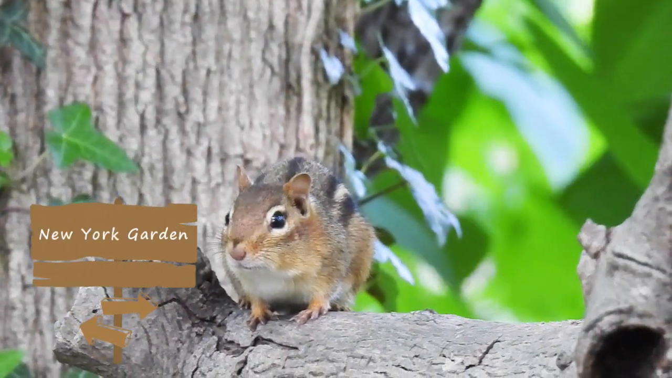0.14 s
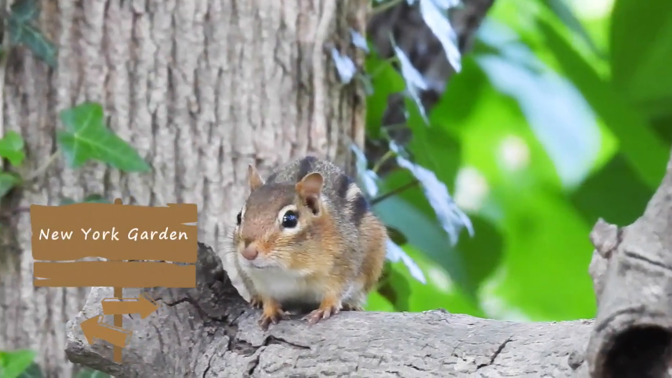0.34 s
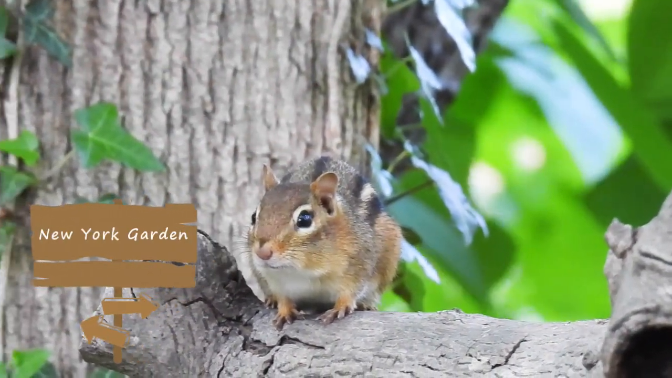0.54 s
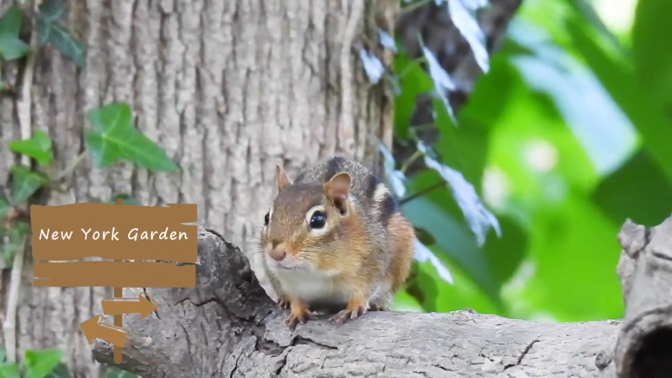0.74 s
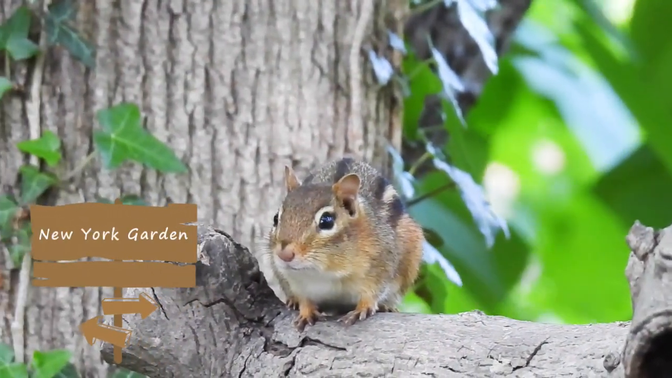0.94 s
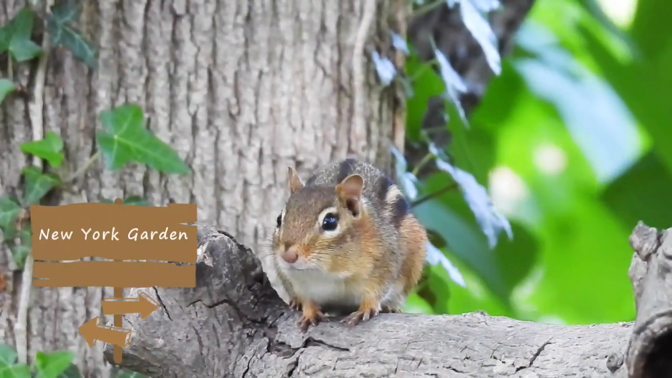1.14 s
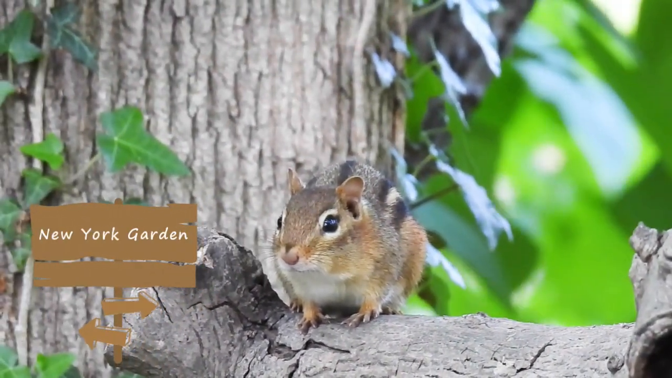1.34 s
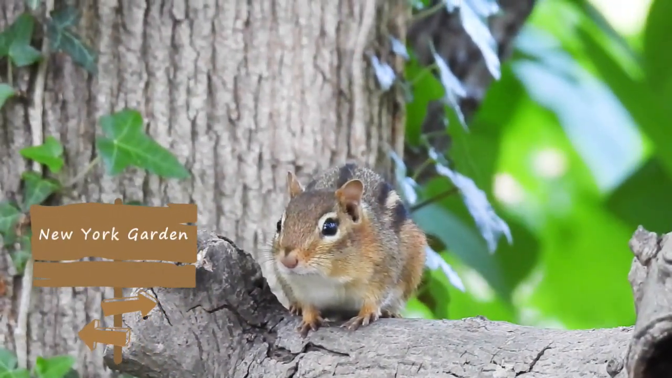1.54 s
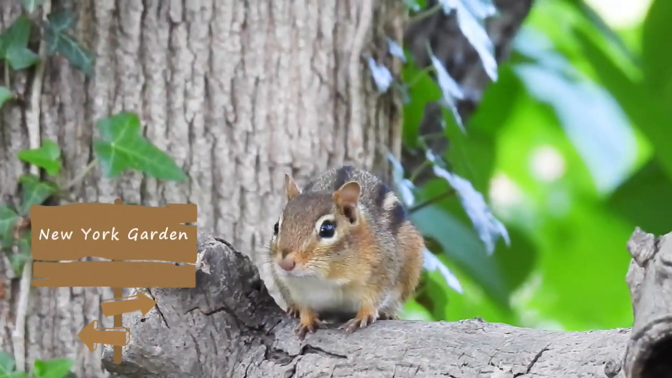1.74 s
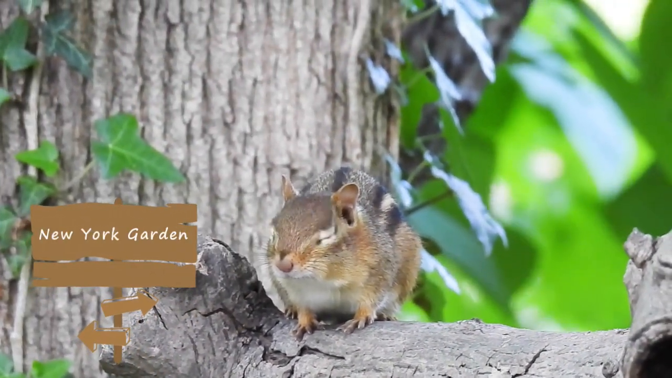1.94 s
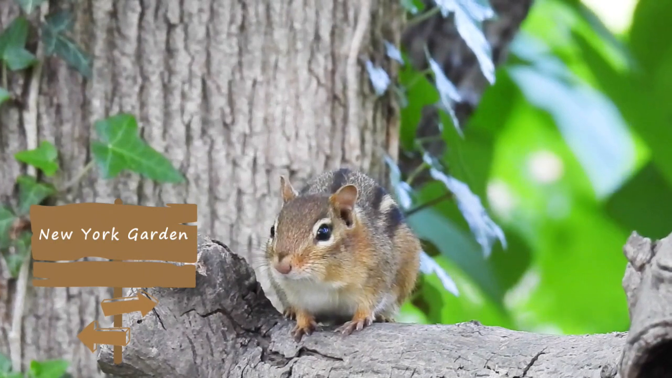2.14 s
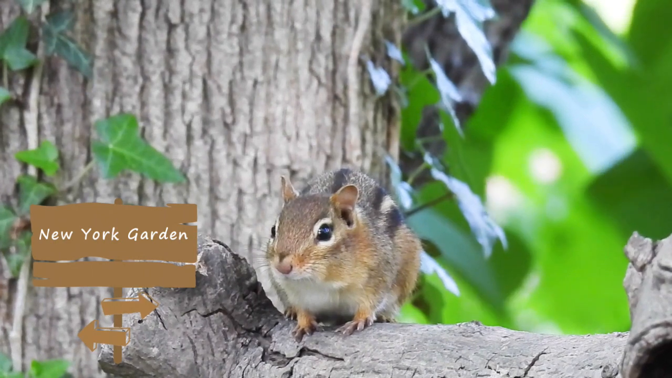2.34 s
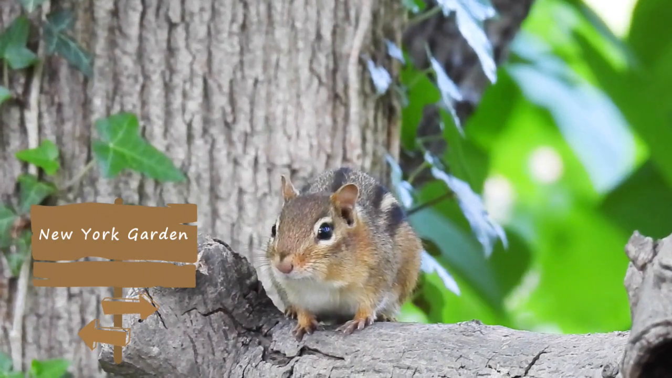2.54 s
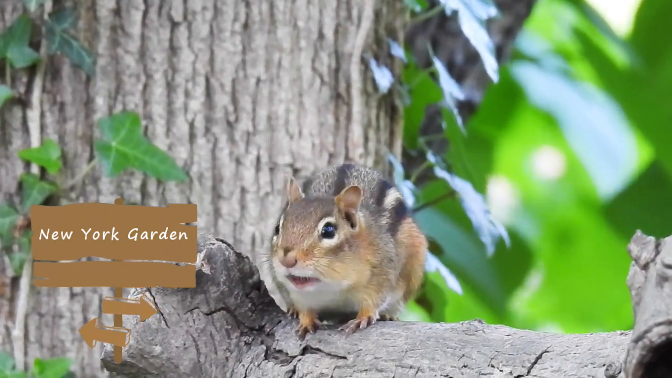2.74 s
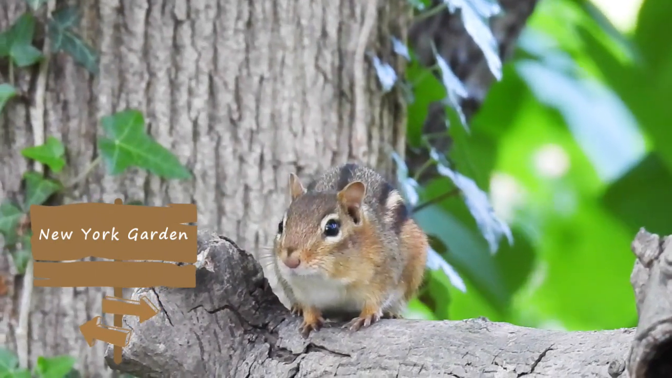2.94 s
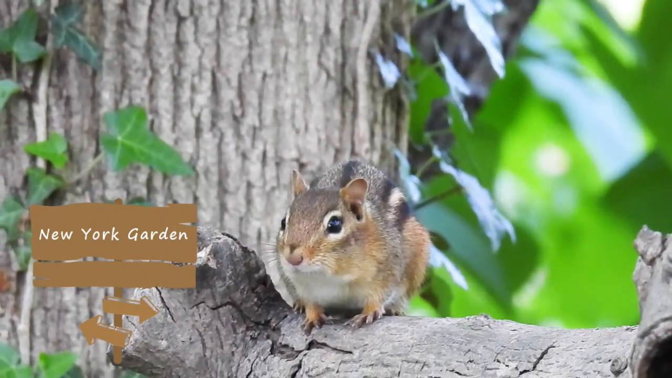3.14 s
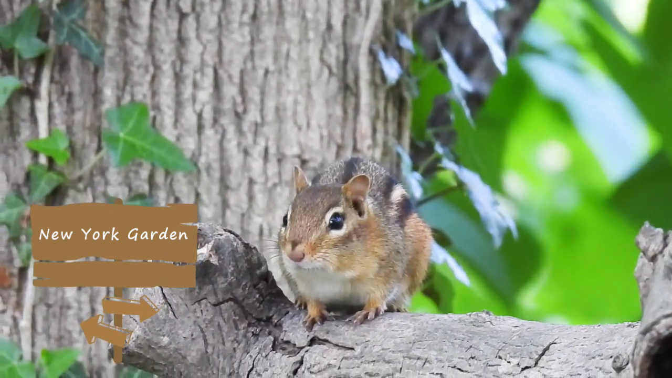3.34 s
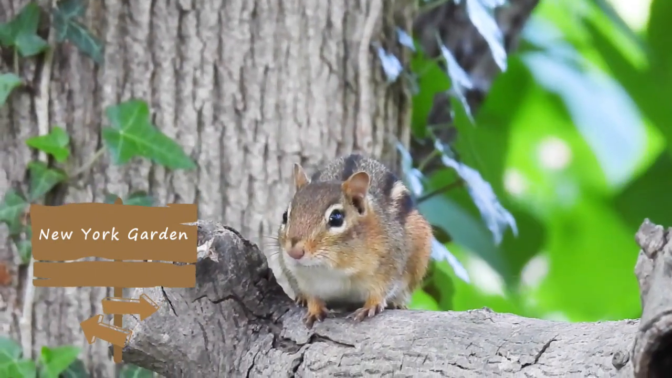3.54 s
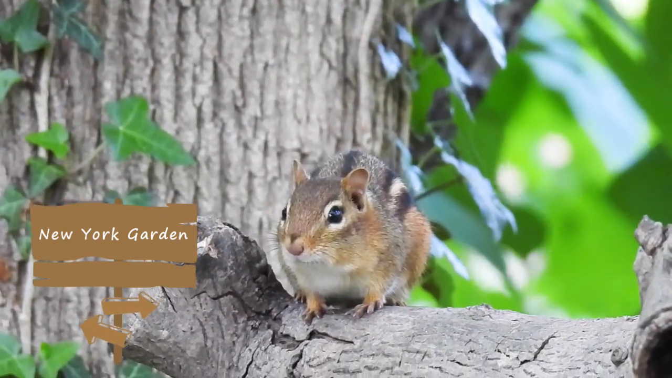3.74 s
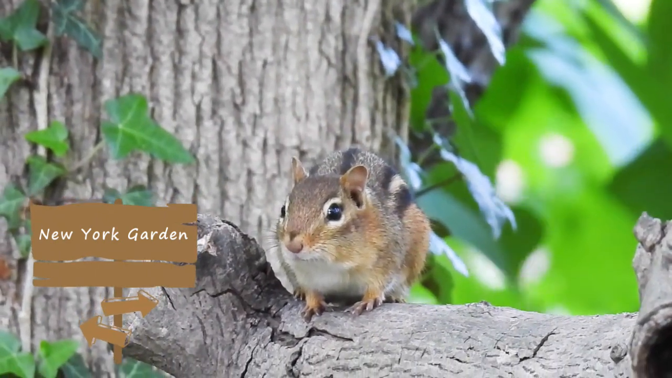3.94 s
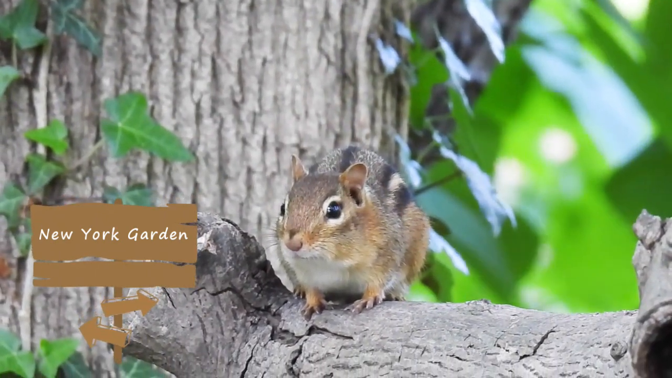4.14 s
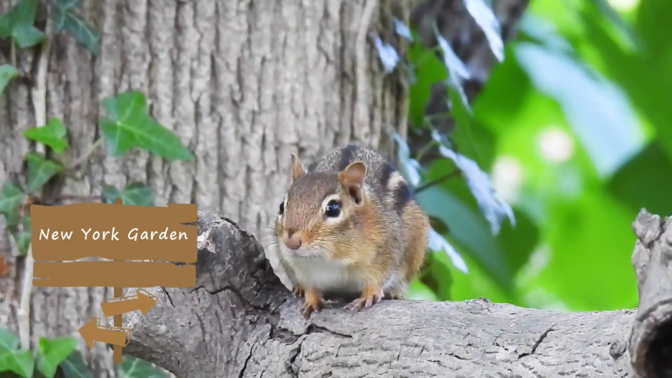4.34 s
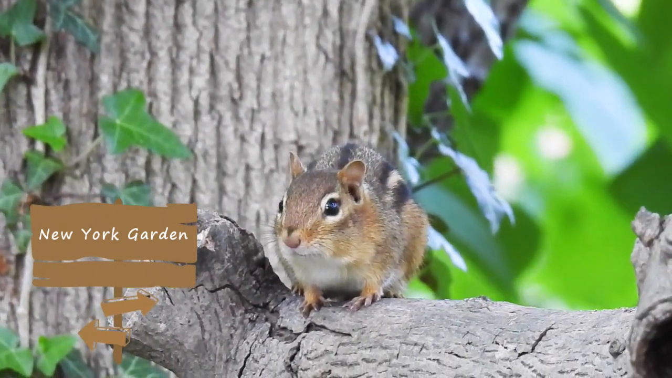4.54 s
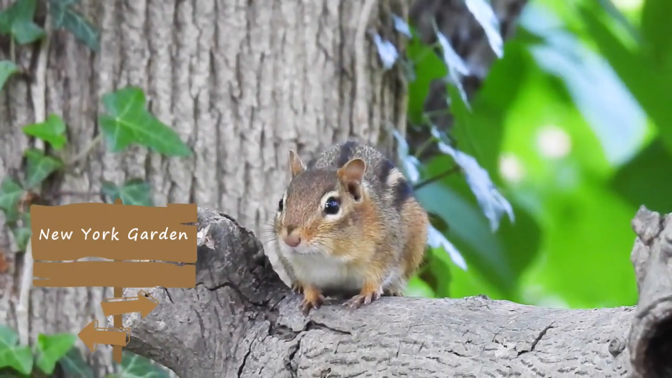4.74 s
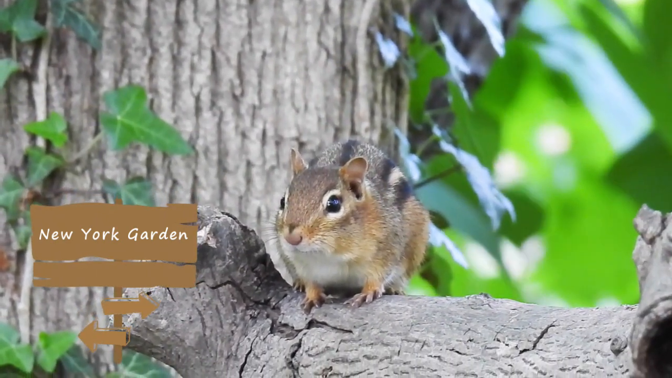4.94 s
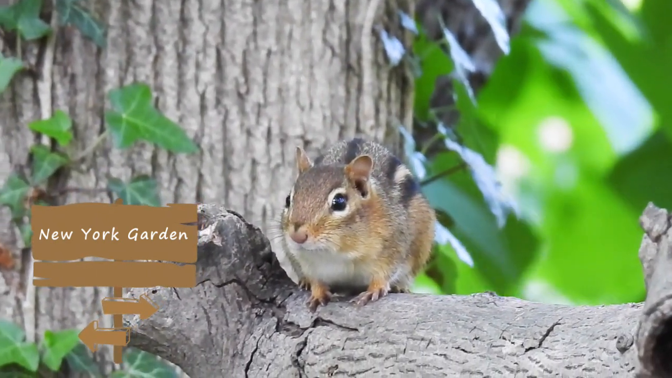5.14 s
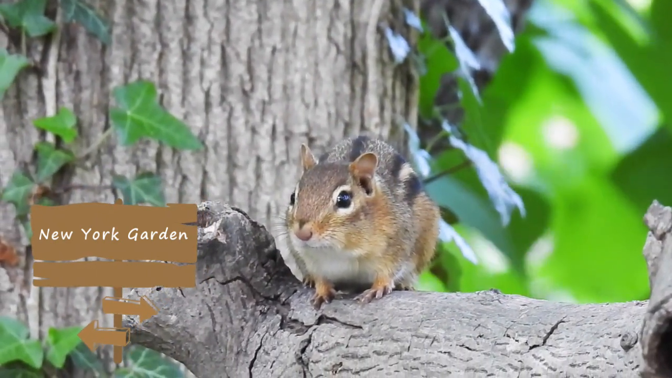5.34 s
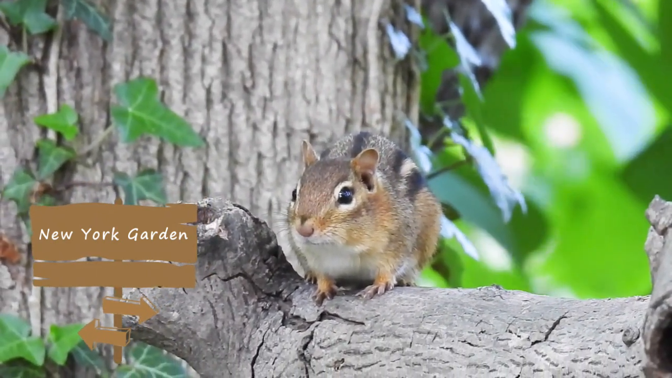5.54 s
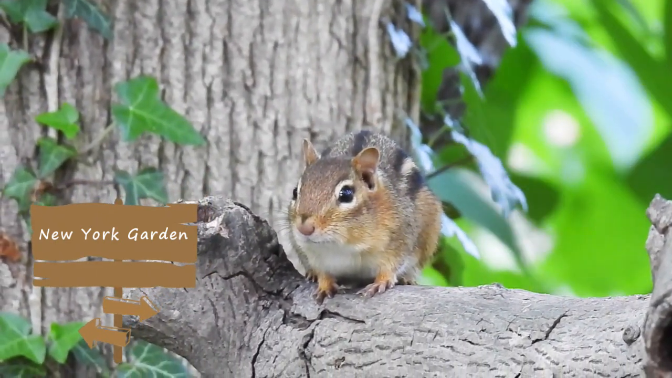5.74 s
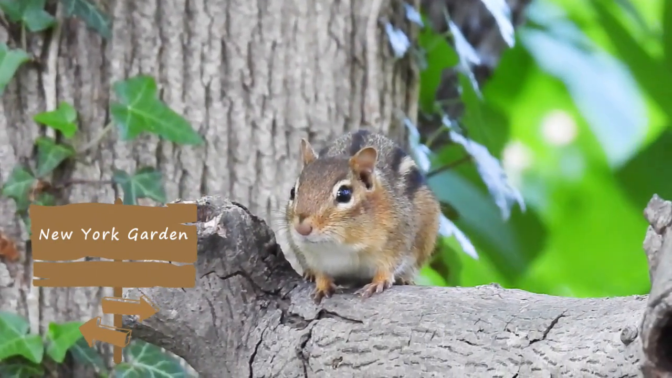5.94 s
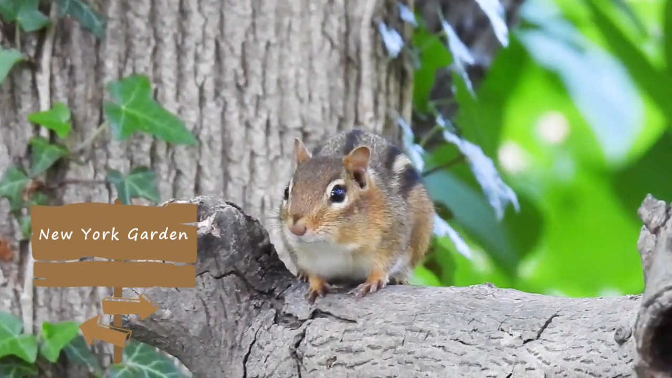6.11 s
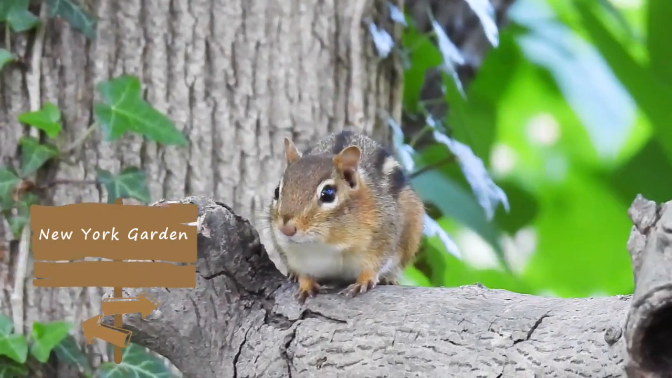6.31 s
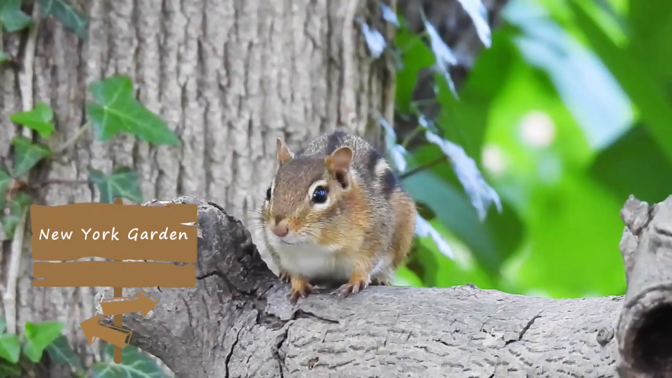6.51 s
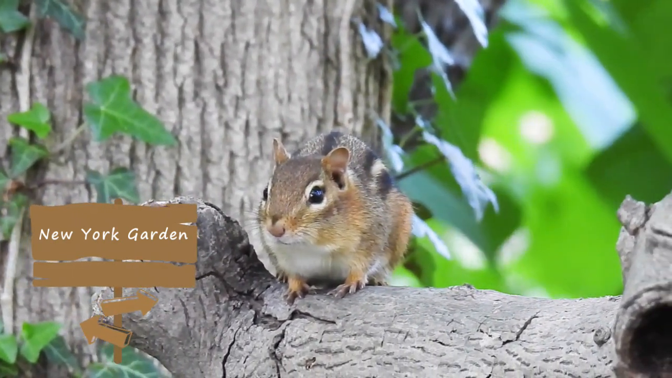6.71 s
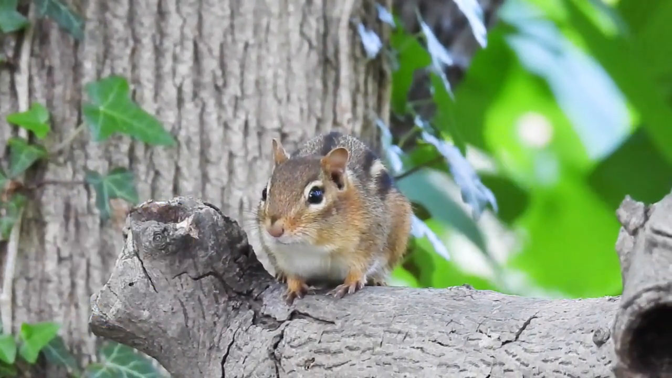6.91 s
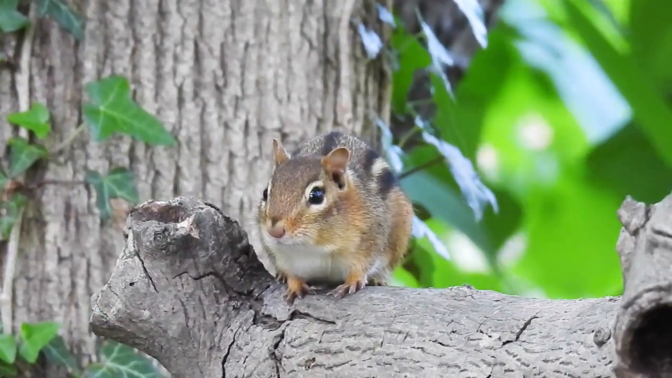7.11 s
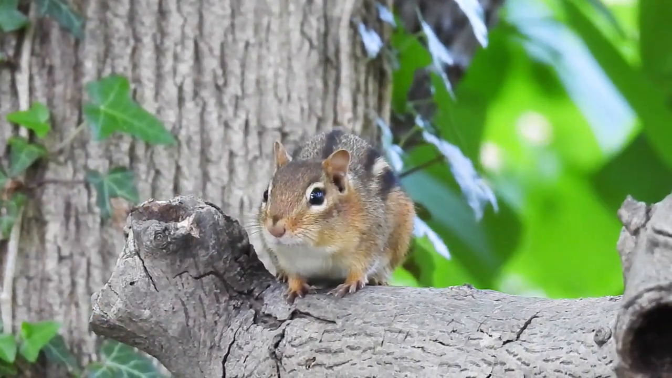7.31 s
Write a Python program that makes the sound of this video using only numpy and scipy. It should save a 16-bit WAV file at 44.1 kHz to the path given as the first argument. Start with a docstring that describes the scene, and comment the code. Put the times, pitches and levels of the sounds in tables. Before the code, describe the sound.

A chipmunk gives two sharp, very high plunging chips several seconds apart, while a songbird and small birds whistle, buzz and trill softly over hiss.

```python
"""In a garden under trees, close to a log: a chipmunk gives two loud chips, each a very high held whistle
that plunges through more than two octaves, and the trees echo them with diffuse noise-like tails.
Further off a songbird whistles and small birds buzz and trill, all gliding sines with tails of their own.
Behind them lie shaped noises, a high hiss and a faint distant rumble, and a faint hum. A noise suppressor
gates the low treble at the microphone; the camera's gain control ducks at each chip and creeps back."""
import sys
import numpy as np
from scipy import signal
from scipy.fft import rfft, irfft, next_fast_len
from scipy.io import wavfile
from scipy.ndimage import uniform_filter1d, minimum_filter1d, map_coordinates

SR = 44100
rng = np.random.default_rng(int(sys.argv[2]) if len(sys.argv) > 2 else 0)


def transcribe(u):
    """Save the signal u as a 16-bit wav file named by the first command-line argument.

    u: samples, shape (n,) or (channels, n), limited to [-1, 1]; the rate is SR.
    q: integer samples, one column per channel.
    """
    v = np.clip(np.atleast_2d(u).T, -1, 1)
    q = np.round(v * 32767).astype(np.int16)
    wavfile.write(sys.argv[1], SR, q)


N = 329427
TIME = np.arange(N) / SR


def amp(db):
    """Decibels to gain."""
    return 10 ** (np.asarray(db) / 20)


def unit(x):
    """Scale to rms 1."""
    return x / np.sqrt(np.mean(x ** 2) + 1e-20)


def along(points, hz):
    """(f/Hz, value) points read on a log frequency axis."""
    f, value = np.transpose(points)
    return np.interp(np.log(hz + 1), np.log(f + 1), value)


def wobble(rate, size=N):
    """A smooth random curve, rate knots a second."""
    knots = rng.standard_normal(size // 16 + 4)
    return map_coordinates(knots, [np.arange(size) * rate / SR], mode="wrap")


def filtered(x, response):
    """x times a response of frequency."""
    m = next_fast_len(N + SR // 2)
    return irfft(rfft(x, m) * response(np.fft.rfftfreq(m, 1 / SR)), m)[:N]


def tone(hz):
    """A sine whose phase accumulates along a pitch curve."""
    return np.sin(2 * np.pi * np.cumsum(hz) / SR)


def whistle(hz, db):
    """One tone with a smoothed pitch curve, a level curve and soft ends."""
    return amp(db) * tone(uniform_filter1d(hz, size=90)) * signal.windows.tukey(len(hz), .06)


def add(track, s, sound):
    """Mix a sound into a track at time s."""
    part = track[max(round(s * SR), 0):][:len(sound)]
    part += sound[:len(part)]


def scattered(sound, stretch):
    """Trunks and leaves return a diffuse tail, new for every call, that decays at its own rate in each band."""
    # the trees' decay time by band, before stretch: f/Hz, t60/s
    trees = [(1000, 0.087), (3200, 0.2), (4500, 0.62), (8000, 0.42), (13500, 0.29)]
    hz, t, z = signal.stft(rng.standard_normal(SR * 3 // 4), SR, nperseg=256)
    t60 = stretch * along(trees, hz)[:, None]
    tail = signal.istft(z * amp(-60 * t / t60), SR, nperseg=256)[1]
    return signal.fftconvolve(sound, tail / np.linalg.norm(tail))


def chipmunk():
    """Each chip arrives clean from the log, and the scatter from the trees follows 3 ms later."""
    # the chips: t/s, held for/s, top f/Hz, level/dB, dip before the plunge/dB
    chips = [(2.8235, 0.0295, 13560, -0.7, 20), (7.2735, 0.030, 13680, 1, 0)]
    # share of a chip that the trees send back: f/Hz, level/dB
    scatter = [(2500, -7), (4700, -6), (8000, -5.5), (13500, -9.5)]
    direct, echo = np.zeros(N), np.zeros(N)
    for s, hold_s, top_hz, db, catch_db in chips:
        call = amp(db) * chip(hold_s, top_hz, catch_db)
        add(direct, s, call)
        add(echo, s + 0.003, scattered(call, stretch=0.74))
    return direct + filtered(echo, lambda hz: amp(along(scatter, hz)))


def chip(hold_s, top_hz, catch_db):
    """A held note droops, may catch, then plunges through the throat's resonances; a second voice rises under it."""
    # the plunge that ends every chip: t/s after the held note, f/Hz
    plunge = [(0.005, 11900), (0.0115, 8700), (0.018, 7600), (0.0235, 5700), (0.0275, 4650), (0.033, 3400),
              (0.04, 2500), (0.048, 2900)]
    # the throat's three resonances set the level as the pitch sweeps through them: f/Hz, level/dB
    throat = [(2500, -30.5), (3450, -14), (4650, -2), (5700, -13), (7600, 0), (8600, 0), (10100, -8.5),
              (11900, -3), (13400, 0.5)]
    attack_s, sag_hz, catch_s = 0.004, 525, 0.0055  # onset of the held note, its droop, length of the dip
    hold_swell_db = 2.5  # the held note grows until it plunges
    # the weak second voice, levels relative to the chip
    under_hz, under_rise_hz, under_db, under_swell_db = 7140, 1800, -36.5, 12

    t = np.arange(0, hold_s + plunge[-1][0], 1 / SR)
    bend = np.minimum(t / hold_s, 1) ** 4
    after_s, plunge_hz = np.transpose([(0, top_hz)] + plunge)
    hz = np.minimum(top_hz - sag_hz * bend, np.interp(t - hold_s, after_s, plunge_hz))

    in_catch = (t > hold_s - catch_s) & (t < hold_s)
    catch = uniform_filter1d(1. * in_catch, size=64)
    swell_db = hold_swell_db * np.minimum(t / hold_s - 1, 0)
    level_db = along(throat, hz) + swell_db - catch_db * catch
    call = whistle(hz, level_db) * np.minimum(t / attack_s, 1)

    rise = bend[t < hold_s]
    add(call, 0, whistle(under_hz + under_rise_hz * rise, under_db + under_swell_db * rise))
    return call


def songbird(trees_db=0.5, direct_db=-6):
    """Slurs, two climbs and a swoop from far up in the trees, half lost in their own echo."""
    # the song climbs twice in two steps: t/s, level/dB
    climbs = [(4.487, -30), (4.683, -25)]
    # the shape of a climb: t/s from its start, f/Hz, level/dB
    climb_shape = [(0, 3400, -15), (0.028, 4100, -6), (0.05, 5600, -1), (0.08, 5800, -4), (0.097, 6850, 2),
                   (0.113, 7480, 1), (0.125, 7580, -11)]
    # one long downward swoop ends the song: t/s from its start, f/Hz, level/dB
    swoop_shape = [(0, 8450, -12), (0.02, 7100, -1), (0.04, 5950, 0), (0.062, 4800, 1), (0.09, 3950, -1),
                   (0.115, 3450, -9), (0.13, 3350, -20)]
    swoop_s, swoop_db = 4.833, -24.5
    settle_share = 0.22  # part of a slur spent on its last pitch

    notes = []
    for s, length, start_hz, end_hz, db in slurs(count=5):
        slur = syllable(length, start_hz, end_hz, buzz_hz=30, ease=1.7, buzz_rate=120,
                        held=settle_share, flutter_db=1)
        notes.append((s, amp(db) * slur))
    for s, db in climbs:
        notes.append((s, amp(db) * phrase(climb_shape)))
    notes.append((swoop_s, amp(swoop_db) * phrase(swoop_shape)))

    out = np.zeros(N)
    for s, note in notes:
        add(out, s, amp(direct_db) * note)
        add(out, s, amp(trees_db) * scattered(note, stretch=1.24))
    return out


def slurs(count):
    """Evenly spaced falling slurs, each louder and wider than the last: t/s, length/s, start and end f/Hz, level/dB."""
    first_s, period_s, length_s = 3.762, 0.143, 0.09
    first_db, grows_db = -44.5, 3.5
    top_hz, end_hz, top_step_hz, end_step_hz = 5900, 5030, 319, -100
    return [(first_s + k * period_s, length_s, top_hz + k * top_step_hz, end_hz + k * end_step_hz,
             first_db + k * grows_db) for k in range(count)]


def phrase(shape):
    """A slightly unsteady whistle along (t/s, f/Hz, level/dB) points."""
    waver_hz = 60
    s, hz, db = np.transpose(shape)
    t = np.arange(0, s[-1], 1 / SR)
    pitch = np.interp(t, s, hz) + waver_hz * wobble(200, size=len(t))
    return whistle(pitch, np.interp(t, s, db))


def syllable(length, start_hz, end_hz, buzz_hz, ease, buzz_rate, held, flutter_db):
    """A bird's note: a glide that eases into its last pitch; a fast uneven buzz shakes pitch and level."""
    size = int(np.clip(length * SR, 64, SR // 2))
    progress = np.minimum(np.arange(size) / size / (1 - held), 1)
    glide = end_hz + (start_hz - end_hz) * (1 - progress) ** ease
    buzz = tone(buzz_rate * (1 + 0.2076 * wobble(60, size=SR // 2)))
    shake = (buzz + .4 * wobble(250, size=SR // 2))[:size]
    return amp(flutter_db * shake) * tone(glide + buzz_hz * shake) * signal.windows.tukey(size, .4)


def small_birds(trees_db=-2, direct_db=-1.5):
    """Buzzing chirps, thin whistles and far trills from around the garden, each with a tail from the trees."""
    # short chirps: t/s, length/s, start f/Hz, end f/Hz, level/dB
    chirps = [(0.0, 0.02, 3370, 3200, -42.5), (0.038, 0.12, 3040, 3840, -45),
              (0.463, 0.031, 2170, 1950, -48), (0.467, 0.065, 3300, 2740, -33),
              (0.535, 0.065, 3800, 4320, -30), (0.62, 0.059, 4285, 4200, -38.5),
              (0.654, 0.049, 3070, 3036, -35), (1.07, 0.0452, 3750, 2900, -42),
              (1.155, 0.033, 3100, 3030, -46), (1.837, 0.038, 3920, 3586, -34.5),
              (1.944, 0.11, 3860, 3800, -42), (2.085, 0.062, 4200, 3796, -31),
              (2.132, 0.041, 3310, 2960, -40.5), (2.198, 0.052, 3220, 3610, -37),
              (2.315, 0.035, 3870, 3140, -37), (2.422, 0.04, 3390, 3040, -45.5),
              (2.47, 0.08, 4340, 4620, -42.5), (2.59, 0.053, 3790, 3100, -37),
              (2.688, 0.042, 3220, 3430, -36), (2.791, 0.05, 3760, 3530, -36),
              (3.685, 0.054, 3314, 3945, -33), (3.778, 0.054, 3600, 3325, -37),
              (3.956, 0.045, 3180, 3120, -29), (3.995, 0.033, 1306, 1250, -44),
              (4.06, 0.031, 3170, 3090, -44.5), (5.598, 0.037, 3050, 3040, -48.5),
              (5.685, 0.029, 3080, 3020, -47.5), (6.821, 0.044, 3540, 3390, -39),
              (6.907, 0.031, 3510, 3330, -42.5), (7.021, 0.03, 3490, 3770, -41),
              (7.041, 0.069, 4393, 4600, -31.5), (7.127, 0.027, 3290, 3100, -42.5),
              (7.142, 0.11, 4620, 4470, -38.5), (7.201, 0.05, 3260, 3550, -40.5),
              (7.369, 0.036, 3265, 3610, -21), (7.459, 0.03, 4470, 4400, -21.5)]
    # thin whistles: t/s, length/s, end f/Hz, level/dB
    whistles = [(0.482, 0.18, 6600, -47), (0.793, 0.085, 4900, -40), (5.341, 0.03, 5220, -38.5),
                (5.472, 0.04, 6280, -38), (5.535, 0.13, 7300, -47), (5.979, 0.13, 5900, -46.5),
                (6.21, 0.044, 4750, -39.5), (6.288, 0.088, 6400, -41), (6.353, 0.094, 5863, -35),
                (6.811, 0.033, 6450, -37.5), (6.868, 0.077, 7370, -42)]
    # far trills, blurred by the trees: t/s, length/s, start f/Hz, end f/Hz, level/dB
    trills = [(1.249, 0.44, 5080, 5490, -43.5), (1.579, 0.46, 5340, 5890, -43),
              (3.12, 0.42, 5230, 5360, -42.5), (3.65, 0.45, 5400, 5610, -50)]
    trill_depth_hz, waver_hz = 480, 70  # shake of a trill, unsteadiness of a thin whistle
    whistle_slide = 0.025  # a whistle drifts up or down by about this share of its pitch

    notes = []
    for s, length, start_hz, end_hz, db in chirps + faint_chirps(count=10):
        notes.append((s, length, start_hz, end_hz, db, buzz_depth(start_hz, end_hz)))
    slides = whistle_slide * rng.standard_normal(len(whistles))
    for (s, length, hz, db), slide in zip(whistles, slides):
        notes.append((s, length, hz * (1 + slide), hz, db, waver_hz))
    notes += [(*trill, trill_depth_hz) for trill in trills]

    out = np.zeros(N)
    for s, length, start_hz, end_hz, db, buzz_hz in notes:
        note = amp(db) * syllable(length, start_hz, end_hz, buzz_hz, ease=1.2, buzz_rate=92,
                                  held=0, flutter_db=min(buzz_hz / 12, 4))
        add(out, s, amp(direct_db) * note)
        add(out, s + .004, amp(trees_db) * scattered(note, stretch=1.18))
    return out


def faint_chirps(count):
    """Further birds at random times and pitches: t/s, length/s, start f/Hz, end f/Hz, level/dB."""
    length_s, level_db, low_hz, high_hz = 0.0475, -47.5, 3330, 6170
    when, pitch, glide = rng.random((count, 3)).T
    start_hz = low_hz + (high_hz - low_hz) * pitch
    end_hz = start_hz * (1 + .2 * (glide - .5))
    return [(s, length_s, a, b, level_db) for s, a, b in zip(when * N / SR, start_hz, end_hz)]


def buzz_depth(start_hz, end_hz):
    """Depth in Hz: chirps that start high or fall far buzz most; low rising ones are clean."""
    clean_below_hz, buzz_share, fall_share = 2790, 0.17, 0.25
    fall_hz = max(start_hz - end_hz, 0)
    return max(buzz_share * (start_hz - clean_below_hz) + fall_share * fall_hz, 0)


def background(hiss_db=-41.5, rumble_db=-58):
    """A high, slightly wavering hiss, a faint distant rumble with its random peaks smoothed out, and a faint hum."""
    # spectra before scaling to rms 1: f/Hz, level per Hz/dB
    hiss = [(1200, -23), (2500, -10.5), (3200, -6.5), (4300, 0), (4900, -1), (6200, -6.5), (7800, -8.5),
            (9400, -12), (10500, -15), (15700, -18.5)]
    rumble = [(25, -30), (45, -30), (80, -6.5), (125, 1.5), (175, -3), (215, 1.5), (255, -6.5), (320, -2.5),
              (500, -0.5), (800, 2.5), (1300, -3.5), (2200, -9.5), (5000, -36)]
    hum_hz, hum_db = 215.3, -78.5
    waver_db = .3 * wobble(3)
    hum = amp(hum_db) * unit(tone(hum_hz + 2 * wobble(4)))
    return amp(hiss_db + waver_db) * noise(hiss) + amp(rumble_db) * smooth_noise(rumble, count=3) + hum


def noise(spectrum):
    """White noise coloured by a spectrum, at rms 1."""
    return unit(filtered(rng.standard_normal(N), lambda hz: amp(along(spectrum, hz))))


def smooth_noise(spectrum, count):
    """Coloured noise of rms 1 whose chance peaks are evened out in count passes."""
    x = rng.standard_normal(N)
    for _ in range(count):
        z = signal.stft(x, nperseg=1024)[2]
        x = signal.istft(z / (np.abs(z) + 1e-12))[1][:N]  # keep the phases, level the magnitudes
    return unit(filtered(x, lambda hz: amp(along(spectrum, hz))))


def scene():
    """Everything that reaches the microphone."""
    return (chipmunk() + songbird() + small_birds() + background())[None]


def suppressor(x, margin_db=3.5, knee_db=0.7):
    """Steady noise in the low treble is turned down; the gate opens around whatever stands out of it."""
    # how far steady sound is turned down: f/Hz, level/dB
    suppression = [(1500, -0.5), (2500, -18), (3200, -23), (3780, -41), (3960, -1)]
    hz, _, z = signal.stft(x, SR, nperseg=1024, noverlap=768)
    power = uniform_filter1d(np.abs(z) ** 2, size=8, axis=0)  # smoothed over frequency, then time
    power = uniform_filter1d(power, size=9, axis=1)
    level_db = 10 * np.log10(np.abs(power) + 1e-16)
    above_db = level_db - np.median(level_db, axis=1, keepdims=True)
    shut = .5 - .5 * np.tanh((above_db - margin_db) / (2 * knee_db))
    gain = amp(shut * along(suppression, hz)[:, None])
    return signal.istft(z * gain, SR, nperseg=1024, noverlap=768)[1][:N]


def gain_control(x, limit_db=-8, attack_s=0.02, hold_s=0.55, release_db=5):
    """The gain drops when the level passes the limit, holds, then recovers by release_db a second."""
    level_db = 10 * np.log10(np.abs(uniform_filter1d(x ** 2, size=256)) + 1e-12)
    excess = np.maximum(level_db - limit_db, 0)
    hold = max(int(hold_s * SR), 2)
    # the largest excess within the hold time just past
    held = -minimum_filter1d(-excess, hold, origin=(hold - 1) // 2, mode="constant")
    cut_db = np.maximum.accumulate(held + release_db * TIME) - release_db * TIME
    keep = np.exp(-1 / (attack_s * SR))
    return x * amp(-signal.lfilter([1 - keep], [1, -keep], cut_db))


def overload(x, bend=0.18, edge_hz=9000):
    """The loudest swings bend unevenly: a chip and its echo beat into a soft knock and a trace of the octave."""
    body = filtered(x, lambda hz: 1 / (1 + (hz / edge_hz) ** 10))
    knock = filtered(body ** 2, lambda hz: 1j * hz / (1j * hz + 350))  # high-pass at 350 Hz
    return x + bend * knock


def record(dry):
    """The camera suppresses noise, rides its gain, overloads a little and keeps nothing above its band limit."""
    top_hz = 15750
    quieted = suppressor(dry[0])
    ridden = gain_control(quieted)
    return filtered(overload(ridden), lambda hz: hz < top_hz)[None]


dry = scene()
out = record(dry)
transcribe(out)
```